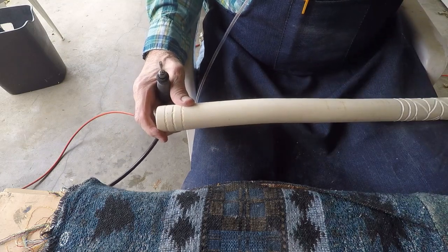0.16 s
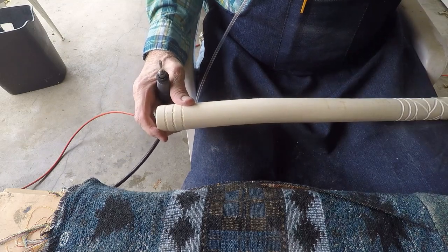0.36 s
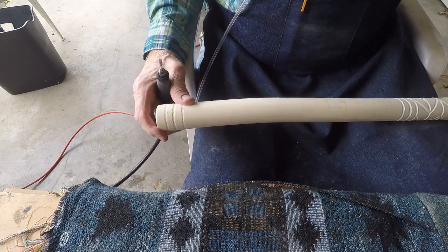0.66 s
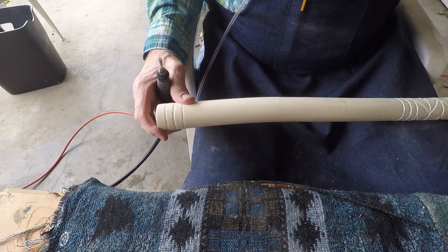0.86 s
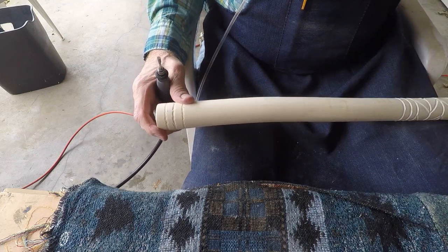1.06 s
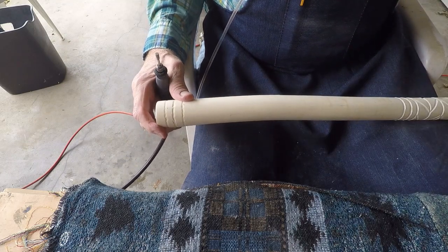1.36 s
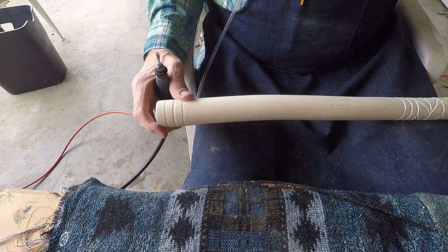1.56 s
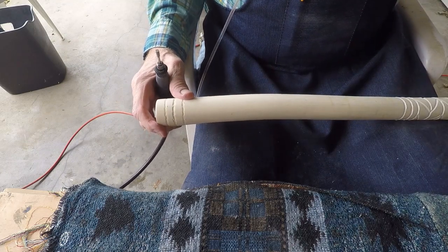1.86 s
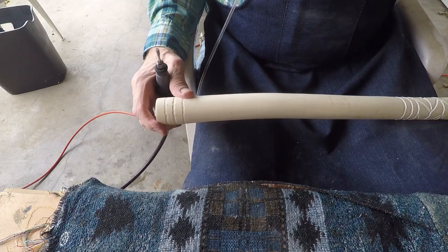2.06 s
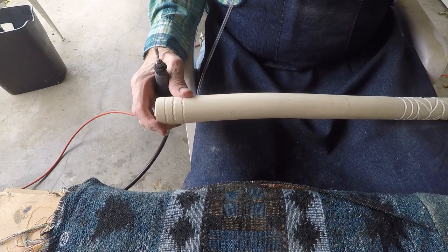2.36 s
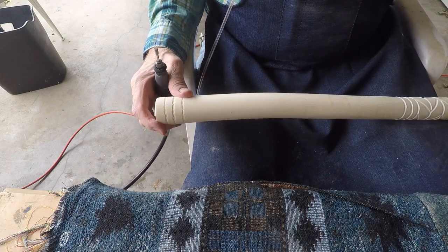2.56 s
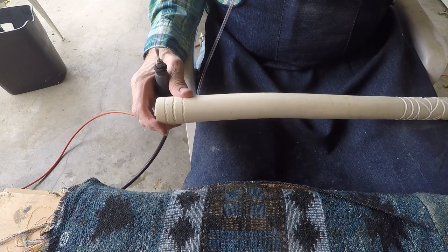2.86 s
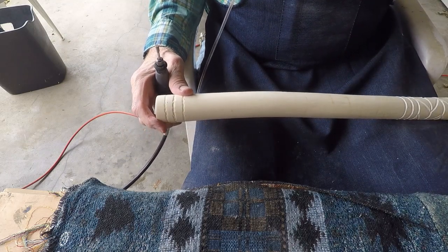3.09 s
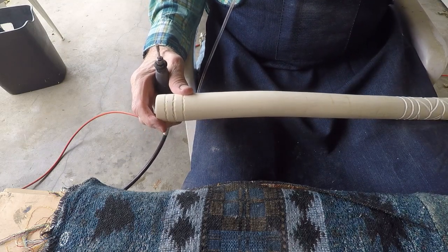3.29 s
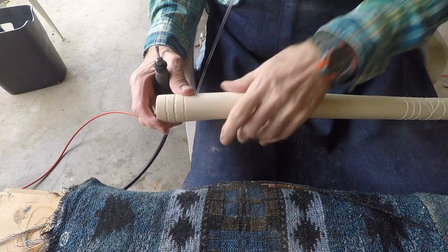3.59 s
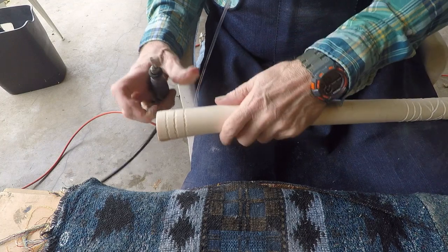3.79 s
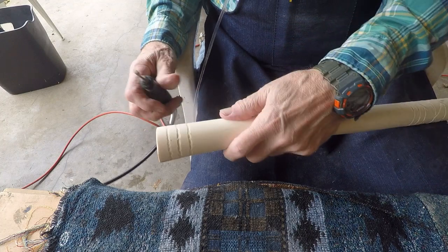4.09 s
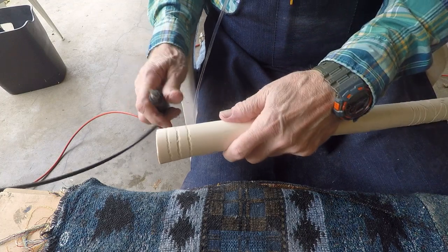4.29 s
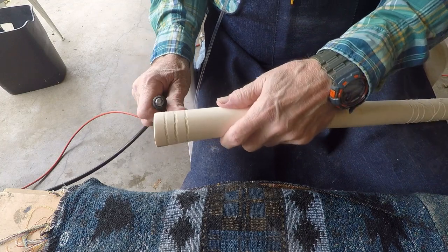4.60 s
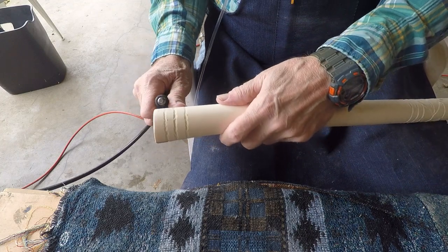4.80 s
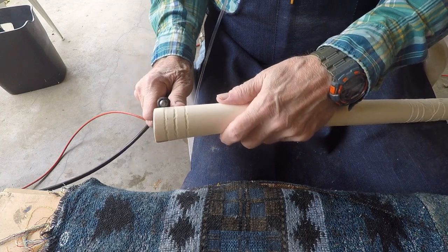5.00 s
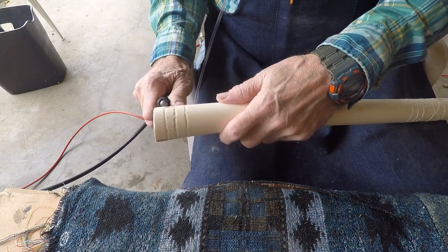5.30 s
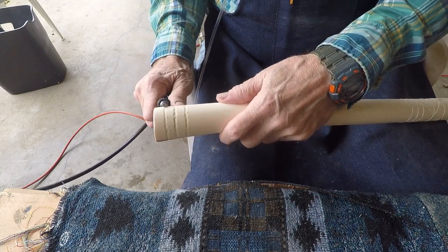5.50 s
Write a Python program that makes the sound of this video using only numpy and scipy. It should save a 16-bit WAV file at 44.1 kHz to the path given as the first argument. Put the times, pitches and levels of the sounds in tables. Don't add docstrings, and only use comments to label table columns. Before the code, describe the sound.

Steady high-speed motor whine, rich in buzzing harmonics, with breathy air noise from its vents and tiny speed twitches. One dull wooden knock comes early, then a quick softer pair mid-way. As the hand shifts its grip, faint resonances come and go, brightest near the end. Camera microphone about an arm's length away, indoors, with faint low rumble and brief compressed, thinned moments.

```python
import sys
import numpy as np
from scipy import signal
from scipy.fft import rfft, irfft, next_fast_len
from scipy.io import wavfile
from scipy.ndimage import uniform_filter1d, minimum_filter1d

SR = 44100
rng = np.random.default_rng(int(sys.argv[2]) if len(sys.argv) > 2 else 0)


def amplitude_ratio(level_db):
    exponent = np.asarray(level_db, float) / 20
    return 10 ** exponent


def output_pcm(signal):
    pcm = np.clip(np.atleast_2d(signal).T, -1, 1) * 32767
    wavfile.write(sys.argv[1], SR, np.round(pcm).astype(np.int16))


N = 249165
T = np.arange(N) / SR
SLOW = 32
T_SLOW = T[::SLOW]

# time in seconds, shaft turns in Hz.
SHAFT_DRIFT = [(0.0, 251.9), (0.43, 254.3), (0.87, 252.3), (1.3, 256.2), (1.74, 254.8), (2.17, 253.4),
               (2.61, 254.8), (3.04, 254.4), (3.48, 252.8), (3.91, 253.7), (4.35, 255.7), (4.78, 256.5),
               (5.22, 253.7), (5.65, 252.3)]
# time in seconds, change of speed in Hz.
TWITCHES = [(0.07, 5.4), (0.27, 1.7), (0.53, 4.2), (0.66, 3.6), (0.73, 1.6), (0.87, 4.7), (1.01, -1.1),
            (1.11, -1.5), (1.31, -2.1), (1.53, -4.4), (1.74, -2.1), (2.01, -2.1), (2.19, 1.4), (2.36, -1.9),
            (2.73, 1.9), (2.83, 3.2), (2.94, 3.1), (3.42, 1.9), (3.6, 2.3), (3.72, -0.6), (3.9, 2.2),
            (4.16, 2.1), (4.43, -3.0), (4.54, -4.0), (4.65, -2.1), (4.89, 1.9), (5.45, -3.0), (5.64, 2.8)]
# multiple of the shaft speed, level in dB rms.
STRONG_ORDERS = [(1, -46.8), (3, -50.4), (4, -55.4), (5, -55.2), (7, -53.6), (8, -44.0), (9, -49.8),
                 (10, -54.0), (12, -45.5), (14, -53.5), (15, -47.8), (16, -40.7), (17, -50.0), (18, -51.6),
                 (20, -51.2), (23, -52.1), (24, -44.0), (25, -45.6), (31, -52.4), (32, -45.5), (33, -54.9),
                 (34, -53.5), (38, -51.9), (39, -54.0), (40, -45.6), (41, -52.2), (47, -54.9), (48, -52.8),
                 (55, -50.0), (56, -50.5)]
# multiple of the shaft speed, level in dB rms.
FAINT_ORDERS = [(2, -59), (37, -57.5), (45, -61), (53, -67), (54, -56), (57, -54), (59, -63)]
# multiple of the shaft speed, level in dB rms.
BEARING_LINES = [(1.65, -62), (2.5, -58), (4.1, -56), (6.27, -57), (8.15, -50), (9.15, -49), (2.94, -56)]
# multiple of the shaft speed, beats added, level in dB rms.
BEATEN_LINES = [(8, -2, -55), (8, -1, -58), (8, 1, -39.8), (8, 2, -53), (8, 3, -54), (16, -1, -47.5),
                (16, 1, -44.5), (16, 3, -58)]
# multiple of the shaft speed, swell in dB per Hz of speed.
FLANK_SWELL = [(3, -.6), (12, -.8), (24, -1.2), (25, 1.2), (40, 1.0), (48, -.6), (56, 1.1)]
# time in seconds, nearness in dB, facing in dB.
HAND_MOVES = [(0, -30, -5.5), (.3, -31, -2), (.7, -30.5, -2.5), (1.1, -30, -3), (1.5, -31.5, -1),
              (2.1, -30.5, -4.5), (2.6, -30.5, -4.5), (3.2, -30.5, -4), (3.8, -31, -3.5),
              (4.3, -31.2, -4.5), (4.7, -31, -6.5), (5.0, -31, -3), (5.4, -31.5, -6), (5.65, -31, -2.5)]
# frequency in Hz, level in dB per Hz.
AIR_SPECTRUM = [(150, -73.5), (300, -81), (480, -78.5), (1000, -77.5), (1800, -77.5), (2600, -75.5),
                (3400, -71.5), (4500, -73), (6000, -71.5), (7200, -75), (10500, -74.5), (12300, -75),
                (13200, -76), (15300, -76)]
# frequency in Hz, width in Hz, level in dB rms.
HOUSING_RINGS = [(744.5, 83, -51.5), (1574, 44, -68), (2260, 190, -50), (3052, 100, -45.5),
                 (4100, 250, -49), (5050, 410, -41), (10040, 640, -49.5), (14100, 570, -51)]
# start in seconds, end in seconds, frequency in Hz, level in dB rms.
GRIP_RINGS = [
    (0, .62, 1530, -47),
    (1.45, 2.45, 1270, -52.5),
    (2.6, 3.15, 1260, -54),
    (4.3, 4.745, 620, -54.5),
    (4.4, 5.3, 2330, -45.5),
    (5.5, 5.65, 1500, -47),
]
# time in seconds, strength in dB.
WOOD_KNOCKS = [
    (.755, -.5),
    (2.9, -9),
    (3.075, -7),
]
# frequency in Hz, level in dB, decay time t60 in seconds.
WOOD_MODES = [(530, -37, .25), (940, -35, .1), (1147, -38, .15), (1330, -41, .12), (1480, -39, .15),
              (1850, -40, .12)]
# frequency in Hz, level in dB per Hz.
RUMBLE_SPECTRUM = [(15, -66.5), (28, -61.5), (50, -66), (80, -60.5), (110, -67), (150, -76), (220, -71),
                   (400, -95.5)]
STARVED_FRAMES = [(0, 1), (15, 1), (26, 1), (30, 1), (38, 1), (44, 2), (49, 1), (52, 3), (56, 2), (60, 2),
                  (68, 2), (83, 1), (106, 1), (111, 1), (114, 1), (125, 1), (130, 1), (135, 2), (139, 1),
                  (148, 1), (172, 1), (175, 1), (207, 2), (210, 1), (241, 1)]
# frequency in Hz, height of a surviving line.
SURVIVOR_HEIGHT = [(0, 6.6), (700, 2.7), (2000, 6.1), (4000, 8.4), (8000, 6.05), (14000, 3.3)]
# time in seconds, low edge in Hz, high edge in Hz, difference in dB.
SIDE_PUFFS = [(0.207, 8871, 11714, -43.7), (0.322, 5684, 7579, -43.0), (0.509, 5081, 6373, -43.1),
              (0.88, 5081, 6373, -46.1), (0.881, 13092, 14470, -47.1), (1.53, 11627, 13178, -45.7),
              (2.366, 13092, 14470, -49.7), (4.386, 4565, 5770, -42.8), (4.387, 11714, 13178, -51.0),
              (4.85, 13092, 14470, -50.3), (4.852, 10335, 11714, -53.4), (4.967, 8268, 9646, -48.3),
              (5.223, 4134, 5167, -47.5), (5.478, 11025, 13092, -45.8)]

BARS = 8
MAINS_BEAT_HZ = 120
TOP_HZ = 15290
HOP = 1024
FRAME = np.arange(2 * HOP)
BIN_HZ = (np.arange(HOP) + .5) * SR / (2 * HOP)
LAPPED = np.cos(np.pi / HOP * np.outer(np.arange(HOP) + .5, FRAME + .5 + HOP / 2))


def speed(twitch_s=.035):
    s, hz = np.transpose(TWITCHES)[:, :, None]
    twitches = hz * np.exp(-.5 * ((T_SLOW - s) / twitch_s) ** 2)
    return np.interp(T_SLOW, *np.transpose(SHAFT_DRIFT)) + np.sum(twitches, axis=0)


def contact(rough, rate):
    return np.sqrt(1 - rough) + np.sqrt(rough / 2) * (walk(rate) + 1j * walk(rate))


def motor(wobble_hz=.35, rough_rate=45, low_trim_db=-2.0, high_trim_db=.5, hum_db_per_hz=-1.5):
    hz = speed()
    off_hz = hz - hz.mean()
    turns = np.cumsum(full(hz + wobble_hz * walk(22))) / SR
    near_db, facing_db = curve(HAND_MOVES, T_SLOW)

    hum_size = full(amplitude_ratio(STRONG_ORDERS[0][1] + 3.5 + hum_db_per_hz * off_hz) * contact(0.16, 15))
    out = (hum_size * np.exp(2j * np.pi * turns)).real

    strong = dict(STRONG_ORDERS)
    faint = [(k, np.interp(k, *np.transpose(FAINT_ORDERS))) for k in range(2, 60) if k not in strong]
    plain = [(k, 0, db) for k, db in STRONG_ORDERS[1:] + faint + BEARING_LINES]
    for k, beats, db in plain + BEATEN_LINES:
        facing_share = np.interp(k * hz.mean(), [3000, 9000], [0, 1])
        swell_db = (.5 if beats else 1.0) * walk(3)
        aim_db = 1.7 * near_db + 1.4 * facing_share * facing_db + swell_db
        bar_passing = k > BARS - .5 and k % BARS < 1.01
        rough = .15 * (1 + k / 20) if bar_passing else .65
        trim_db = np.interp(k, [2, 24], [low_trim_db, high_trim_db])
        flank_db = dict(FLANK_SWELL).get(k, 0) * off_hz
        size = contact(rough, rough_rate) * amplitude_ratio(db + 3 + trim_db + aim_db + flank_db)
        cycles = k * turns + beats * MAINS_BEAT_HZ * T + rng.random()
        angle = 2 * np.pi * cycles + full(np.unwrap(np.angle(size)))
        out = out + full(np.abs(size)) * np.cos(angle)
    return out, turns


def fan(turns, mains_depth=0.091, turn_depth=.1, gust_db=0.5):
    air = coloured(AIR_SPECTRUM)
    for hz, width, db in HOUSING_RINGS:
        air = air + amplitude_ratio(db + 1.4 * full(walk(12))) * noise_ring(hz, hz / width)
    near_db, facing_db = curve(HAND_MOVES)
    treble = band(air, 8000, SR)
    treble_gain = amplitude_ratio(0.51 * facing_db + .3 * full(walk(3)))
    out = amplitude_ratio(.7 * near_db) * (air - treble + treble_gain * treble)
    mains_pulse = mains_depth * np.sin(2 * np.pi * MAINS_BEAT_HZ * T)
    turn_pulse = turn_depth * np.sin(2 * np.pi * turns)
    return out * (1 + mains_pulse + turn_pulse) * full(amplitude_ratio(gust_db * walk(11)))


def grip(fade_s=.08, q=70):
    out = 0
    for start_s, end_s, hz, db in GRIP_RINGS:
        hold = np.clip(np.minimum(T - start_s, end_s - T) / fade_s + .5, 0, 1)
        out = out + amplitude_ratio(db) * noise_ring(hz, q) * hold
    return out


def knock(start_s, crack_db=-32, crack_t60=.17):
    t = np.maximum(T - start_s, 0)
    modes = 0
    for hz, db, t60 in WOOD_MODES:
        modes = modes + amplitude_ratio(db) * np.sin(2 * np.pi * hz * t) * np.exp(-np.log(1000) * t / t60)
    crack = band(rng.standard_normal(N), 600, 1900)
    crack = amplitude_ratio(crack_db) * crack / crack.std() * np.exp(-np.log(1000) * t / crack_t60)
    onset = 1 - np.exp(-t / 0.0035)
    return (modes + crack) * onset * full(amplitude_ratio(2.0 * walk(60)))


def room(deep_swell_db=4.0, low_swell_db=1.5):
    rumble = coloured(RUMBLE_SPECTRUM)
    deep = band(rumble, 0, 45)
    return deep * full(amplitude_ratio(deep_swell_db * walk(6))) + (rumble - deep) * full(amplitude_ratio(low_swell_db * walk(6)))


def starve(x, stand_out=2.7, leak_db=-31, bass_hz=130):
    basis = np.sin(np.pi * (FRAME + .5) / (2 * HOP)) * LAPPED
    centres = 515 + HOP * np.concatenate([first + np.arange(frames) for first, frames in STARVED_FRAMES])
    bins = np.pad(x, HOP)[centres[:, None] + FRAME] @ basis.T
    around = np.sqrt(uniform_filter1d(bins ** 2, size=48, axis=1))
    tallest = np.abs(bins) == -minimum_filter1d(-np.abs(bins), size=3, axis=1)
    bar = np.clip(BIN_HZ / bass_hz, .3, 1) * stand_out * around
    height = np.interp(BIN_HZ, *np.transpose(SURVIVOR_HEIGHT))
    kept = height * np.sign(bins) * (tallest & (np.abs(bins) > bar))
    lost = (amplitude_ratio(leak_db) * BIN_HZ / TOP_HZ - 1) * bins
    return x + overlap(centres, (kept + lost) @ basis * 2 / HOP)


def split():
    s, lo_hz, hi_hz, db = np.transpose(SIDE_PUFFS)[:, :, None]
    in_band = (BIN_HZ > lo_hz) & (BIN_HZ < hi_hz)
    puffs = rng.standard_normal((len(SIDE_PUFFS), HOP)) * in_band @ LAPPED
    window = signal.windows.kaiser_bessel_derived(2 * HOP, 4 * np.pi)
    puffs = puffs / puffs.std(axis=1, keepdims=True) * window
    centres = 945 + HOP * np.round((s[:, 0] * SR - 945) / HOP).astype(int)
    return overlap(centres, amplitude_ratio(db + 2.0) * puffs)


def curve(table, t=T):
    s, *columns = np.transpose(table)
    return np.array([np.interp(t, s, c - c.mean()) for c in columns])


def walk(rate):
    k = int(SR / SLOW / rate)
    held = np.repeat(rng.standard_normal(len(T_SLOW) // k + 1), k)
    w = uniform_filter1d(uniform_filter1d(held, k), k)[:len(T_SLOW)]
    return w / w.std()


def full(slow):
    return np.interp(T, T_SLOW, slow)


def coloured(points):
    hz, db = np.transpose(points)
    f = np.maximum(np.fft.rfftfreq(N, 1 / SR), 1)
    gain = amplitude_ratio(np.interp(np.log(f), np.log(hz), db))
    return irfft(rfft(rng.standard_normal(N)) * gain, N) * np.sqrt(SR / 2)


def noise_ring(hz, q):
    ring = signal.lfilter(*signal.iirpeak(hz, q, fs=SR), rng.standard_normal(N))
    return ring / ring.std()


def band(x, lo_hz, hi_hz):
    size = next_fast_len(len(x))
    f = np.fft.rfftfreq(size, 1 / SR)
    return irfft(rfft(x, size) * ((f >= lo_hz) & (f < hi_hz)), size)[:len(x)]


def overlap(centres, frames):
    places = np.asarray(centres)[:, None] + FRAME
    return np.bincount(places.ravel(), frames.ravel(), N + 2 * HOP)[HOP:HOP + N]


def scene():
    whine, turns = motor()
    knocks = sum(amplitude_ratio(db) * knock(s) for s, db in WOOD_KNOCKS)
    mono = whine + fan(turns) + grip() + knocks + room()
    return np.array([mono, mono])


def band_limit(x):
    return signal.sosfilt(signal.butter(12, 16610, fs=SR, output="sos"), x)


def record(dry):
    mono = band(starve(dry[0]), 0, TOP_HZ)
    side = split()
    return band_limit(np.array([mono + side, mono - side]))


dry = scene()
out = record(dry)
output_pcm(out)
```